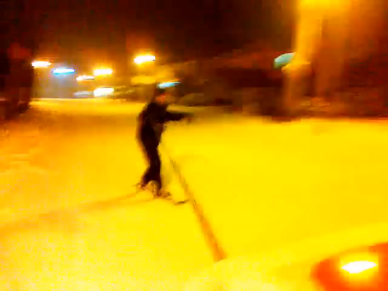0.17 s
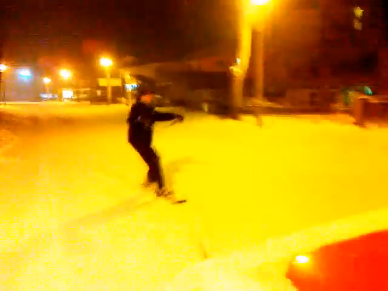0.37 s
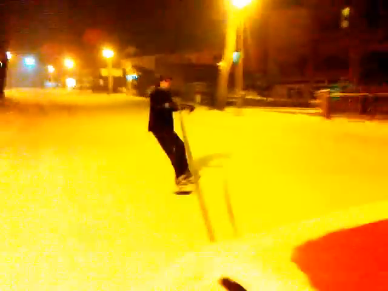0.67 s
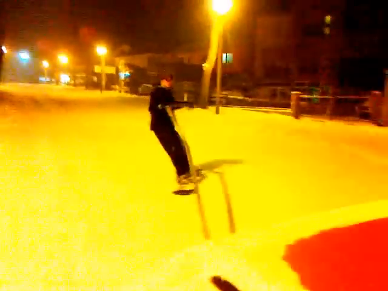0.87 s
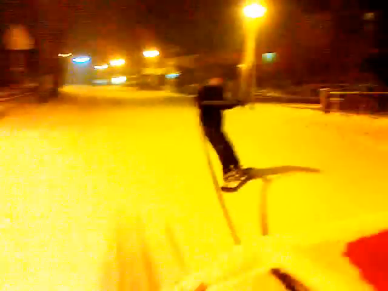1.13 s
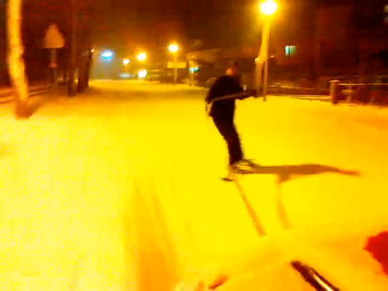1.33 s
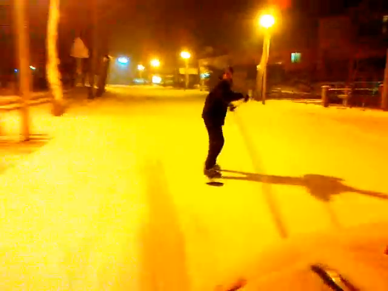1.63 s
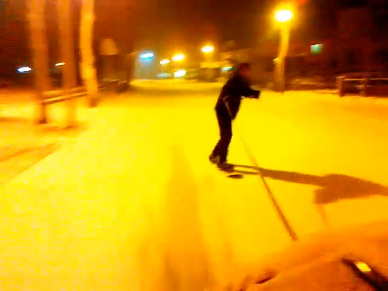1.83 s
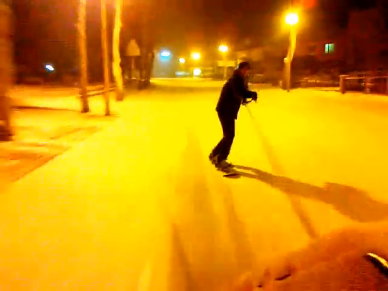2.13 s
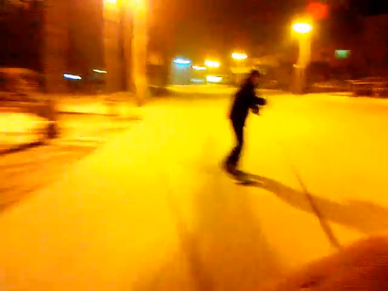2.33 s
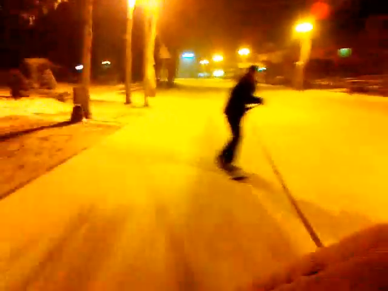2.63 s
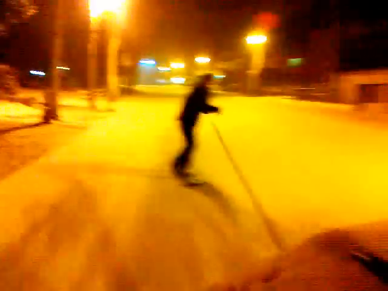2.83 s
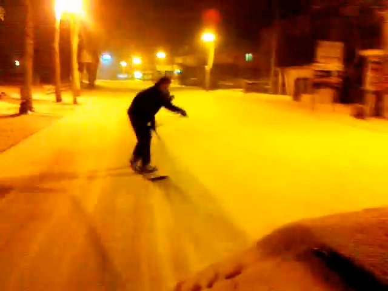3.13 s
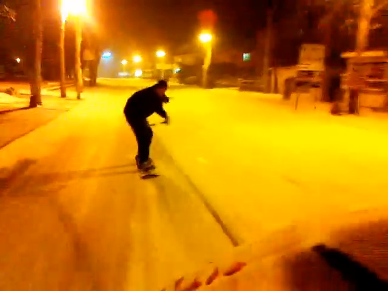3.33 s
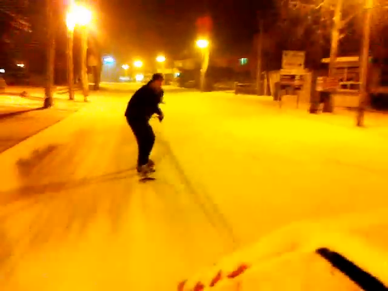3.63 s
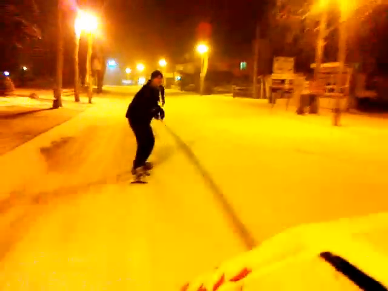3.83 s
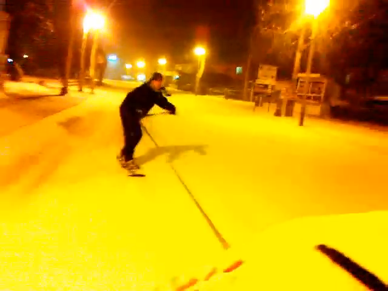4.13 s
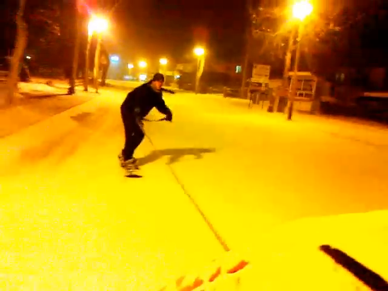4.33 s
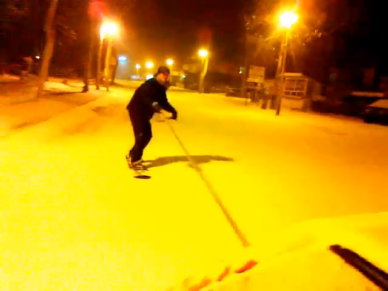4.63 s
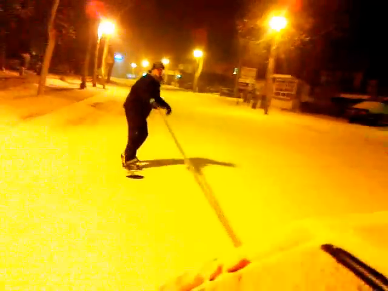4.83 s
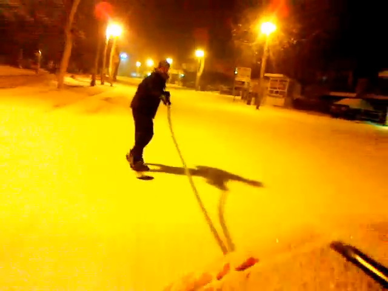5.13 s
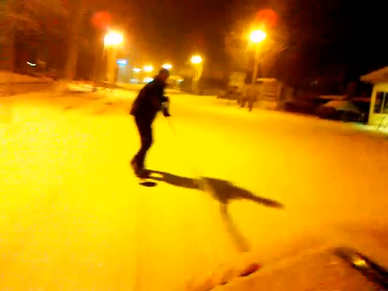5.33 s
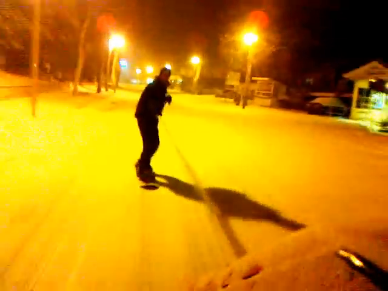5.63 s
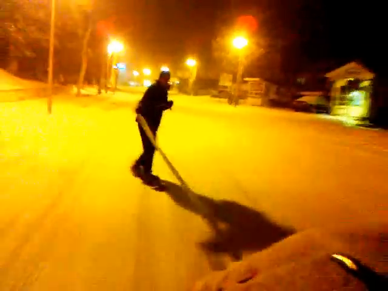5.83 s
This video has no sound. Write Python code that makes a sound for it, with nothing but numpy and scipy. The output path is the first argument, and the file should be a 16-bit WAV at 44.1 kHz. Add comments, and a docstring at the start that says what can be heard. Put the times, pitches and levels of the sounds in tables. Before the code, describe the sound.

A car drives along a snowy street towing a snowboarder, heard by an exposed microphone on the car. Low tyre rumble and dull roar run throughout, easing slightly late. Wind buffets irregularly from the start, with deep swinging surges and soft thumps; from 0.6 seconds the gusts sharpen, and between 1.2 and 2.5 they crowd into fluttering, crackling slaps. Gritty snow crunch flares briefly near 1.3. From about 2.6 the snow swells into a coarse rush with a thin spray hiss, strongest around 3.0 to 3.5, while hard ice lumps clack, scrape and crumble in quick irregular bursts, the loudest near 2.86, 3.0, 3.27 and 3.74. The clatter dwindles by 4.0, leaving rumble, softer wind and a few faint ticks. Gusts return from 5.3; a faint whistle slides upward at 5.75, then around 5.85 a head-on blast overloads the microphone with dry pops and torn, spitting hiss.

```python
"""Ragged gusts buffet a microphone over the steady roar of tyres: a car tows a snowboarder along a snowy street.
Midway a rush of snow and ice swells up, with hard lumps clacking; near the end a blast hits the port head-on.
Wind is noise evened out, then shaped by gusts and deep swinging surges; snow is dense random grains.
Each lump of ice is a short ring, a snap and crumbling noise; the tyres are coloured noise."""
import sys
import numpy as np
from scipy import signal
from scipy.fft import rfft, irfft, next_fast_len
from scipy.io import wavfile
from scipy.ndimage import uniform_filter1d, minimum_filter1d, map_coordinates

SR = 44100
rng = np.random.default_rng(int(sys.argv[2]) if len(sys.argv) > 2 else 0)


def wav_out(sig):
    """Save sig, one row per channel (or a flat mono array), as 16-bit PCM at SR to the path in sys.argv[1]."""
    wavfile.write(sys.argv[1], SR, np.round(np.clip(np.atleast_2d(sig).T, -1, 1) * 32767).astype(np.int16))


N = 264284
T = np.arange(N) / SR  # seconds

# Snow under way, before load and patchiness: time_s, crunch_db, spray_db, hardness_db (relative to crunch)
SNOW = [(0.0, -35.5, -71, -20), (0.6, -34, -65, -29), (1.05, -24, -60, -17), (1.3, -24, -49, -9),
        (1.37, -28.5, -58.5, -15), (1.48, -27, -57, -16.5), (1.74, -30.5, -67, -19),
        (1.92, -28, -64.5, -26), (2.19, -27, -58, -16), (2.33, -29.5, -58, -14.5), (2.6, -25, -55.5, -19),
        (2.87, -24, -48, -14), (3.07, -19, -48.5, -17), (3.22, -22, -48, -5.5), (3.33, -22, -45.5, -4),
        (3.47, -23.5, -55, -8.5), (3.58, -29, -62, -7.5), (3.82, -25, -62, -9.5), (4.04, -32, -64, -12.5),
        (5.46, -33, -62.5, -11), (5.78, -35, -64, -10), (5.99, -29.5, -55, -6)]
# Spectrum of brittle crackling, in wind and grit: frequency_hz, relative level_db
CRACKLE = [(300, -18), (900, -2), (1800, 0), (2700, -5), (3500, -15), (5000, -27), (8000, -39.5),
           (11000, -50), (15000, -64)]
# Spectrum of ice knocking or scraping: frequency_hz, relative level_db
CLACK = [(300, -26), (750, -5), (1200, 0), (2700, 0), (3400, -7), (4600, -26), (9000, -44), (16000, -64)]


def amp(db):
    """Decibels to gain."""
    return 10 ** (np.asarray(db) / 20)


def unit(x):
    """Scale x to rms 1."""
    return x / np.sqrt(np.mean(x ** 2) + 1e-20)


def curves(rows):
    """One value per sample for each column after the time."""
    s, *cols = np.transpose(rows)
    return [np.interp(T, s, c) for c in cols]


def wobble(rate):
    """A smooth random curve, rate knots a second."""
    knots = rng.standard_normal(int(N * rate / SR) + 4)
    return map_coordinates(knots, [T * rate])


def coloured(x, spectrum):
    """Pass x through a causal filter with the given (Hz, dB) points."""
    m = 2 * next_fast_len(len(x) // 2 + 4096)
    hz, db = np.transpose(spectrum)
    log_hz = np.log(np.fft.rfftfreq(m, 1 / SR) + 1)
    gain = amp(np.interp(log_hz, np.log(hz), db))
    # Folding the cepstrum onto positive time gives minimum phase: no ringing ahead of an attack.
    cepstrum = irfft(np.log(gain), m)
    cepstrum[1:m // 2] *= 2
    cepstrum[m // 2 + 1:] = 0
    return irfft(rfft(x, m) * np.exp(rfft(cepstrum)), m)[:len(x)]


def noise(spectrum):
    """Coloured noise of rms 1."""
    return unit(coloured(rng.standard_normal(N), spectrum))


def envelope(x, span):
    """Running rms, smoothed twice over span seconds."""
    size = max(int(span * SR), 1)
    power = uniform_filter1d(uniform_filter1d(x ** 2, size), size)
    return np.sqrt(np.abs(power) + 1e-12)


def even(x, span):
    """Even out the swells of x that are slower than span seconds."""
    return x / envelope(x, span)


def pulses(rate, scatter_db):
    """Pulses at random moments, rate a second, of scattered size and either sign."""
    hits = rng.random(N) < rate / SR
    sign = rng.choice([-1, 1], N)
    return hits * sign * amp(scatter_db * rng.standard_normal(N))


def bursts(rows, rise, fall):
    """Gain curve of (start s, end s, dB) bursts with exponential flanks; overlaps add in power."""
    t, power = T[::16], 0
    for start, end, db in rows:
        before, after = np.maximum(start - t, 0), np.maximum(t - end, 0)
        power = power + (amp(db) * np.exp(-before / rise - after / fall)) ** 2
    return np.interp(T, t, np.sqrt(power))


def add(track, s, sound):
    """Mix a short sound into the track at s seconds."""
    part = track[max(round(s * SR), 0):][:len(sound)]
    part += sound[:len(part)]


def wind():
    """Big eddies swing the pressure; in each gust smaller ones thump and flutter, and sharp slaps crackle."""
    # Gusts on the port: start_s, end_s, strength_db, edge_db (below 0 a dull thump, above 0 a tearing slap)
    gusts = [(0.008, 0.013, -25, 8), (0.018, 0.032, -21, -7), (0.14, 0.149, -22.5, -15),
             (0.163, 0.179, -26.5, -17), (0.218, 0.217, -20, -14), (0.236, 0.282, -25.5, -14),
             (0.479, 0.487, -20, -5), (0.577, 0.591, -23, -10), (0.619, 0.631, -22, -16),
             (0.647, 0.693, -17, 0.5), (0.695, 0.706, -16, -1.5), (0.711, 0.737, -20, -0.5),
             (0.81, 0.832, -16, 2), (0.839, 0.85, -20, 2.5), (0.895, 0.901, -23, 7),
             (1.052, 1.134, -25.5, -1), (1.184, 1.191, -14, 5.5), (1.195, 1.198, -14.5, 6),
             (1.211, 1.221, -15, 3), (1.269, 1.303, -18.5, 1), (1.313, 1.312, -17, 6),
             (1.324, 1.334, -16.5, -9), (1.396, 1.412, -13, 3.5), (1.427, 1.456, -18, 7.5),
             (1.463, 1.469, -18, 5), (1.469, 1.475, -15.5, 11), (1.478, 1.491, -16, 0.5),
             (1.501, 1.522, -16.5, 6), (1.551, 1.568, -17, 3), (1.589, 1.587, -17, -9),
             (1.621, 1.635, -16, 4), (1.635, 1.646, -15.5, 7.5), (1.657, 1.669, -17.5, 9.5),
             (1.681, 1.71, -16, 3), (1.784, 1.799, -15, 1), (1.813, 1.849, -19, -4.5),
             (1.857, 1.873, -17.5, -6.5), (1.874, 1.887, -17, 4), (1.899, 1.905, -19, -2),
             (1.924, 1.931, -17.5, 7), (1.942, 1.959, -15, 1), (1.967, 2.028, -23, -7),
             (2.069, 2.1, -23, -7), (2.115, 2.139, -20.5, -5), (2.167, 2.232, -17.5, 0.5),
             (2.237, 2.242, -13.5, 5.5), (2.265, 2.27, -17, 8), (2.285, 2.312, -16.5, 6),
             (2.314, 2.328, -13.5, 7), (2.349, 2.358, -16.5, -2), (2.361, 2.368, -13, 13),
             (2.369, 2.374, -13.5, 7.5), (2.395, 2.419, -15, 2), (2.424, 2.434, -13, 8),
             (2.455, 2.505, -17.5, 8), (2.518, 2.551, -18.5, 1.5), (2.63, 2.711, -22.5, -4),
             (2.892, 2.945, -25, -8), (2.985, 3.001, -21, -8), (3.19, 3.221, -18, -4),
             (3.284, 3.319, -23.5, -14), (3.368, 3.393, -21, -9), (3.544, 3.547, -18, -0.5),
             (3.599, 3.615, -23, -4), (3.659, 3.669, -20, -0.5), (4.024, 4.077, -27.5, -10),
             (4.404, 4.432, -23.5, -15), (4.782, 4.823, -22.5, -24.5), (5.009, 5.03, -25, -3),
             (5.073, 5.077, -25.5, -4), (5.282, 5.285, -16, -5.5), (5.348, 5.373, -17.5, -5.5),
             (5.393, 5.415, -21.5, -4.5), (5.421, 5.45, -21, 1), (5.466, 5.474, -17, 1.5),
             (5.491, 5.515, -18, -0.5), (5.524, 5.566, -21, -10), (5.608, 5.605, -22, -24.5),
             (5.63, 5.635, -16, -0.5), (5.834, 5.867, -15.5, 3), (5.868, 5.869, -7.5, -1),
             (5.902, 5.904, -14.5, -3), (5.94, 5.962, -19.5, 6), (5.971, 5.98, -22, 5)]
    # Push of the wind between gusts, before it wavers: time_s, level_db
    push_between = [(0.0, -23), (0.2, -22), (0.55, -18.5), (0.9, -20.5), (1.28, -24.5), (1.48, -17),
                    (1.75, -23), (2.05, -20.5), (2.43, -18), (2.74, -13), (2.99, -25.5), (3.52, -22),
                    (3.85, -30), (4.15, -25), (4.65, -22.5), (5.15, -20.5), (5.37, -15.5), (5.72, -20),
                    (5.87, -18.5), (5.99, -16.5)]
    # Spectra of pressure swing, thump and flutter: frequency_hz, relative level_db
    swing_spectrum = [(8, -41), (20, 6), (32, -2), (55, -3), (80, -5), (125, -12), (200, -18), (400, -40.5),
                      (1000, -81), (3000, -120)]
    thump_spectrum = [(30, -29.5), (80, -11.5), (130, 2), (190, -4), (270, -16), (450, -21), (1200, -57.5),
                      (4000, -93.5)]
    flutter_spectrum = [(40, -26.5), (150, -6.5), (260, 1), (370, -2), (600, -8.5), (1000, -12.5),
                        (1700, -20.5), (2700, -39.5), (4300, -73), (9000, -76), (16000, -86)]

    start, end, strength_db, edge_db = np.transpose(gusts)
    thump_db = strength_db - 0.45 * edge_db  # a sharp edge takes from the thump
    shove = bursts(zip(start, end, thump_db - 3), rise=.017, fall=0.04)
    steady = amp(curves(push_between)[0] + 1.5 * wobble(9.9))
    swing = np.sqrt(steady ** 2 + shove ** 2)
    rumble = swing * even(noise(swing_spectrum), span=0.058)

    thump_gain = bursts(zip(start, end, thump_db - 2), rise=0.0069, fall=0.01)
    thump = thump_gain * even(noise(thump_spectrum), span=0.02)

    eddies = even(coloured(pulses(rate=1500, scatter_db=4), flutter_spectrum), span=0.014)
    push = bursts(zip(start, end, strength_db + 1.34), rise=0.002, fall=0.007)
    # Small puffs of flutter ride on every pressure swing, even between gusts.
    puffs = amp(-12.5 + 1.9 * wobble(15)) * swing
    flutter = np.hypot(push, puffs) * eddies

    # The crackle comes in clusters, one on each slap of the flutter.
    slaps = envelope(eddies, span=.0025) ** 2
    sputter = even(coloured(pulses(rate=4000, scatter_db=3.5), CRACKLE), span=.005)
    edge = bursts(zip(start, end, strength_db - 14.5 + edge_db), rise=0.0013, fall=0.0025)
    crackle = edge * even(slaps * sputter, span=0.0071)
    return rumble + thump + flutter + crackle


def surges():
    """Each big eddy rocks the pressure back and forth for a swing or two as it passes."""
    # Deep surges: centre_s, level_db (before the overall trim), swing_hz (before it wanders)
    eddy_rows = [(.12, -18, 49.8), (.47, -12, 43.87), (.69, -11.5, 39), (1.07, -10.5, 52), (1.2, -20, 40),
                 (1.3, -13.5, 41), (1.45, -9.5, 55.66), (1.6, -12, 40), (1.68, -16, 53), (1.78, -15, 51.9),
                 (2.0, -12, 47), (2.08, -14, 43), (2.17, -13, 62.85), (2.46, -14.5, 51), (2.56, -12, 34.93),
                 (2.68, -13, 55.2), (2.8, -14.5, 48.2), (2.91, -10, 59), (3.12, -17, 44.86),
                 (3.23, -17, 42.9), (3.29, -16.5, 34), (3.56, -11.5, 36.5), (3.66, -11.5, 46.9),
                 (3.81, -19, 49), (4.08, -19, 61.1), (4.27, -15, 40), (4.42, -20, 50.04),
                 (4.64, -15.5, 48.7), (5.29, -12.5, 36), (5.39, -12, 48), (5.53, -14, 46.2),
                 (5.83, -9.5, 56)]
    width_s, wander, trim_db = 0.025, .3, -0.9
    total = np.zeros(N)
    clock = np.cumsum(np.exp(wander * wobble(70))) / SR  # uneven time makes the swing rate stray
    for (s, db, hz), turn in zip(eddy_rows, rng.random(len(eddy_rows))):
        near = np.abs(T - s) < .15
        passing = np.exp(-.5 * ((T[near] - s) / width_s) ** 2)
        rocking = np.sin(2 * np.pi * (hz * clock[near] + turn))
        total[near] += np.sqrt(2) * amp(db + trim_db) * passing * rocking
    return total


def blast():
    """Air driven straight into the port breaks into spitting hiss and a few dry pops."""
    # Tearing hiss: start_s, end_s, level_db (before the overall lift)
    hiss_rows = [(5.83, 5.838, -30), (5.842, 5.847, -28.5), (5.851, 5.866, -32), (5.869, 5.883, -22),
                 (5.889, 5.903, -36), (5.906, 5.909, -28.5), (5.94, 5.944, -35.5), (5.952, 5.957, -32.5)]
    # Sharp pops of the port: time_s, peak_db
    pop_rows = [(5.827, -6.5), (5.863, -7.5), (5.882, -19), (5.8928, -13.5)]
    # Spectrum of torn air: frequency_hz, relative level_db
    tear_spectrum = [(500, -7), (2000, 2), (3200, -0.5), (5000, -11), (8000, -23), (15500, -36.5)]
    spit = even(coloured(pulses(rate=9000, scatter_db=4), tear_spectrum), span=.006)
    track = amp(4.5) * bursts(hiss_rows, rise=0.00098, fall=0.0025) * spit
    t = np.arange(int(.003 * SR)) / SR
    for s, db in pop_rows:
        add(track, s, amp(db) * np.exp(-t / .00005))
    return track


def snow():
    """Crushed crust crunches in dense grains, throws a fine spray and sheds sparse bits of grit."""
    # Spectra of the crunch and the spray: frequency_hz, relative level_db
    crunch_spectrum = [(300, -13), (600, -8.5), (900, -0.5), (1400, 5), (1900, 3), (2700, -10), (3500, -22),
                       (4500, -35), (7000, -45), (15000, -67.5)]
    spray_spectrum = [(2000, -8.5), (3700, 12), (4600, 0), (5600, 0), (7500, -8.5), (9200, -13),
                      (11500, -19), (15000, -35)]
    crunch_db, spray_db, hardness_db = curves(SNOW)

    grains = unit(coloured(pulses(rate=1800, scatter_db=2.5), crunch_spectrum))
    # Harder crust snaps in denser, higher grains.
    brittle_spectrum = [(1200, -26), (2300, 1.5), (2900, 1), (3700, -15), (4600, -33), (9000, -52)]
    brittle = unit(coloured(pulses(rate=2200, scatter_db=2), brittle_spectrum))
    # Light rolling barely breaks the crust: the crunch only opens up under load.
    load = amp(crunch_db + 2)
    opened = load * load / np.hypot(load, amp(-21))
    patchy_db = 1.38 * wobble(29.9) + 1.85 * wobble(110)
    crunch = amp(patchy_db) * opened * (grains + amp(hardness_db) * brittle)

    # The spray, too, only flies once the board digs in.
    thrown = amp(spray_db)
    flying = thrown * thrown / np.hypot(thrown, amp(-60.5))
    mist = unit(coloured(pulses(rate=1700, scatter_db=1), spray_spectrum))
    spray = amp(7 + 1.7 * wobble(32)) * flying * mist

    bits = unit(coloured(pulses(rate=230, scatter_db=5), CRACKLE))
    grit = amp(-51.5 + 4.5 * wobble(17)) * bits
    return crunch + spray + grit


def lumps():
    """Each ice lump grinds, breaks with a snap and a dead clack, then crumbles in grains near its pitch."""
    # Lumps at set times, strong and faint: break_s, level_db (before the trim), ring_hz,
    # crumble_s (60 dB fall, floored below), snap_db (relative to the lump's level)
    placed_lumps = [(2.594, -7, 1600, 0.055, -30), (2.636, -18, 2400, 0.018, -14),
                    (2.795, -18, 2470, .02, -16), (2.8585, 4, 2370, 0.018, -23),
                    (2.894, -18, 2570, .02, -16.5), (2.9513, -3.5, 1430, 0.01, -28),
                    (2.972, -14, 2300, .02, -18), (2.985, -8, 1870, 0.017, -33), (3.0, 6, 1350, 0.014, -37),
                    (3.044, -8, 2750, 0.031, -24), (3.071, -4, 1450, 0.028, -37),
                    (3.108, -0.5, 1637, 0.025, -30), (3.128, -3, 1280, 0.02, -27),
                    (3.141, -2, 1410, 0.016, -32), (3.156, -3, 1270, 0.03, -27),
                    (3.238, -10, 2250, 0.035, -26), (3.251, -7.5, 2700, 0.023, -19.5),
                    (3.265, 6.5, 2300, 0.032, -38), (3.289, -8, 1850, 0.023, -32),
                    (3.317, -8.5, 1710, 0.017, -26), (3.323, -10.5, 2634, 0.023, -25),
                    (3.345, -15, 2400, 0.025, -25), (3.371, -7.5, 1290, 0.043, -19.5),
                    (3.397, -4, 1810, 0.031, -30), (3.414, -4, 1800, 0.06, -30),
                    (3.447, -6.5, 1250, 0.055, -30), (3.463, -1, 1700, 0.032, -21),
                    (3.512, -10.5, 1070, 0.018, -33), (3.593, -12, 1320, 0.036, -34),
                    (3.64, -5.5, 1520, 0.058, -17.5), (3.706, -14.5, 1960, 0.04, -30),
                    (3.718, -9, 2000, 0.028, -25), (3.735, 1, 1930, 0.015, -31),
                    (3.742, -5.5, 1500, 0.023, -37), (3.751, -9, 1800, 0.055, -23),
                    (3.846, -13, 1370, 0.025, -33), (3.9, -8.5, 1500, 0.051, -38),
                    (3.935, -14, 2320, 0.057, -21), (3.976, -19.5, 2500, 0.033, -24),
                    (4.016, -13.5, 1900, 0.017, -35), (4.226, -26, 2620, 0.06, -24),
                    (4.24, -24.5, 2300, 0.04, -22), (4.325, -25, 2960, 0.03, -24),
                    (4.368, -26, 2820, 0.035, -18), (4.629, -25.5, 3000, 0.028, -18)]
    # Spectrum of the bright snap: frequency_hz, relative level_db
    snap_spectrum = [(1500, -20), (2600, -1.5), (3600, 4), (4500, -7), (6500, -19), (9000, -33),
                     (15000, -55)]
    lead_s, lead_db, trim_db = 0.0037, -11.5, -6  # grinding before the break; overall trim
    track, early = np.zeros(N), .015
    since = np.arange(int(.075 * SR)) / SR - early  # seconds from the break
    t, broken = np.maximum(since, 0), since > 0
    for s, db, hz, life, snap_db in list(placed_lumps) + small_lumps(count=7):
        tone = np.sin(2 * np.pi * hz * t)
        ring = tone * amp(-60 * t / 0.009) * (1 - np.exp(-t / 0.00026))
        grains = rng.standard_normal(len(t))
        grain_ring = (tone * amp(-60 * t / 0.001))[broken]
        tuned = signal.fftconvolve(grains, grain_ring)[:len(t)]

        grinding = amp(lead_db) * np.exp(-np.abs(since) / lead_s)
        crumbling = amp(-60 * t / max(life, .005))
        crushing = np.where(broken, crumbling, grinding)
        crumbs = even(1.4 * grains + 1.26 * unit(tuned), span=0.0037) * crushing
        clack = coloured(ring + 0.69 * crumbs, CLACK)
        snap = coloured(rng.standard_normal(len(t)) * broken * amp(-60 * t / 0.029), snap_spectrum)
        # Levels set the peak of each part's running rms.
        add(track, s - early, amp(db + trim_db) * clack / envelope(clack, span=0.0017).max())
        add(track, s - early, amp(db + snap_db + trim_db) * snap / envelope(snap, span=0.0014).max())
    return track


def small_lumps(count):
    """Loose ice as lump rows: one at random in each equal part of the icy stretch, following the crunch."""
    from_s, to_s = 2.4, 3.1
    above_crunch_db, scatter_db = 6, 2
    s = from_s + (to_s - from_s) * (np.arange(count) + rng.random(count)) / count
    size, pitch = rng.standard_normal((count, 2)).T
    db = np.interp(s, T, curves(SNOW)[0]) + above_crunch_db + scatter_db * size
    ring_hz = 1700 * np.exp(.25 * pitch)
    return list(zip(s, db, ring_hz, np.full(count, .025), np.full(count, -20)))


def scrapes():
    """Ice sticks and slips: a quick run of small slips rings around a wavering pitch."""
    # Longer scrapes over ice: start_s, end_s, level_db (before the overall lift), pitch_hz (centre)
    scrape_rows = [(1.044, 1.055, -27, 2000), (3.126, 3.139, -15.5, 1413), (3.256, 3.274, -16, 2256),
                   (3.374, 3.38, -19, 1388), (3.397, 3.433, -18, 1797)]
    slip_spectrum = [(400, 0.5), (800, -9), (1400, -15), (3000, -53)]
    slips = coloured(pulses(rate=1500, scatter_db=3), slip_spectrum)
    waver = 1 + .06 * wobble(60)
    start, _, _, hz = np.transpose(scrape_rows)
    current = np.maximum(np.searchsorted(start - .01, T) - 1, 0)
    pitch = hz[current] * waver  # each scrape keeps to its own pitch
    carrier = np.sin(2 * np.pi * np.cumsum(pitch) / SR)
    rasp = even(coloured(slips * carrier, CLACK), span=0.025)
    return amp(3) * bursts([row[:3] for row in scrape_rows], rise=0.0058, fall=0.0029) * rasp


def ticks():
    """Bright ticks, each a tiny noise burst coloured around its own pitch."""
    # Ticks: time_s, level_db (before the overall trim), pitch_hz
    tick_rows = [(0.5894, -37.5, 9500), (1.0168, -30, 7000), (1.1312, -42, 9500), (1.2848, -38, 11600),
                 (1.4884, -44.5, 13000), (1.511, -36.5, 11000), (1.6154, -42, 11000), (2.515, -37.5, 8000),
                 (2.858, -26.5, 5500), (2.951, -39, 9000), (2.9994, -31, 9000), (3.1075, -28.5, 9000),
                 (3.6405, -34, 8200), (3.735, -40, 8200), (3.933, -44, 8200), (3.955, -44, 8200),
                 (4.053, -33, 8000), (4.061, -46.5, 8200), (4.3899, -37.5, 8200)]
    # Spectrum of a tick: multiple of the tick's pitch [ratio], relative level_db
    tick_spectrum = [(.37, -19), (.73, -8), (1, 1), (1.22, -7.5), (1.83, -15)]
    track, t = np.zeros(N), np.arange(int(0.025 * SR)) / SR
    for s, db, hz in tick_rows:
        own_spectrum = [(hz * ratio, level) for ratio, level in tick_spectrum]
        tick = coloured(rng.standard_normal(len(t)) * amp(-60 * t / 0.007), own_spectrum)
        add(track, s, amp(db - 9.5) * tick / envelope(tick, span=0.0015).max())
    return track


def swishes():
    """Loose powder brushes the housing in a soft, sandy sizzle of sparse grains."""
    # Puffs of powder snow: start_s, end_s, level_db
    puff_rows = [(.575, .665, -62.5), (1.215, 1.3, -60.5), (1.76, 2.2, -71), (2.34, 2.68, -66)]
    # Spectrum of the sizzle: frequency_hz, relative level_db
    sizzle_spectrum = [(2000, -19), (5000, -1.5), (7500, -4.5), (10500, 3), (12500, -6.5), (15000, -17)]
    sizzle = unit(coloured(pulses(rate=770, scatter_db=0), sizzle_spectrum))
    return bursts(puff_rows, rise=.008, fall=0.017) * sizzle


def whistle():
    """A faint sine whistle slides upward, wavering in pitch and level in the wind."""
    # Glide of the whistle, before it wavers: time_s, pitch_hz, level_db
    glide = [(5.73, 800, -48), (5.742, 820, -33), (5.762, 850, -37), (5.79, 945, -35.5), (5.822, 1000, -43)]
    hz, db = curves(glide)
    phase = 2 * np.pi * np.cumsum(hz * (1 + .009 * wobble(250))) / SR
    sounding = (T > glide[0][0]) * (T < glide[-1][0])
    return np.sqrt(2) * amp(db + wobble(120)) * sounding * np.sin(phase)


def car():
    """Tyres rumble and roar on packed snow: coloured noise with a slightly uneven level."""
    # Level of the tyres, before the unevenness: time_s, level_db
    road = [(0, -25), (4.3, -26.5), (5.6, -28), (5.78, -32)]
    # Spectrum of the roar: frequency_hz, relative level_db
    tyre_spectrum = [(25, 12.5), (50, 17.5), (150, 6.5), (280, 1), (450, -9), (750, -5), (1150, -1.5),
                     (1700, -8), (2300, -27), (3200, -19), (4300, -36.5), (5500, -40.5), (8000, -50),
                     (15000, -60.5)]
    unevenness_db = .8 * wobble(5) + 1.3 * wobble(25)
    return amp(curves(road)[0] + unevenness_db) * noise(tyre_spectrum)


def scene():
    """Everything meets at the one microphone."""
    air = wind() + surges() + blast() + whistle()
    ice = snow() + lumps() + scrapes() + swishes()
    return (air + ice + ticks() + car())[None]


def record(dry):
    """A fast look-ahead limiter holds the peaks, then a steep filter removes all above the band limit."""
    ceiling, top_hz = .95, 15900
    needed = np.minimum(1, ceiling / (np.abs(dry) + 1e-9))
    held = minimum_filter1d(needed, size=181)
    gain = uniform_filter1d(uniform_filter1d(held, size=91), size=91)
    m = next_fast_len(N + 4096)
    in_band = np.fft.rfftfreq(m, 1 / SR) < top_hz
    return irfft(rfft(dry * gain, m) * in_band, m)[:, :N]


dry = scene()
out = record(dry)
wav_out(out)
```